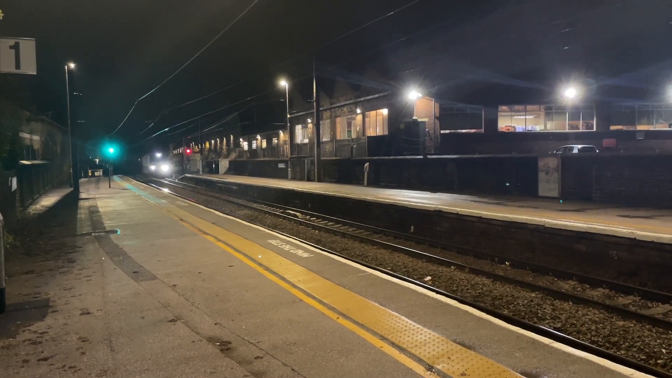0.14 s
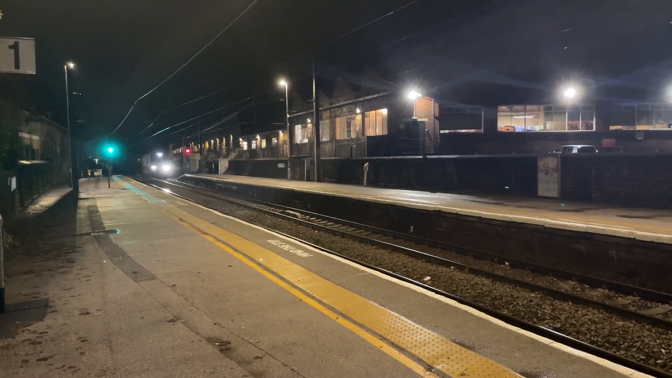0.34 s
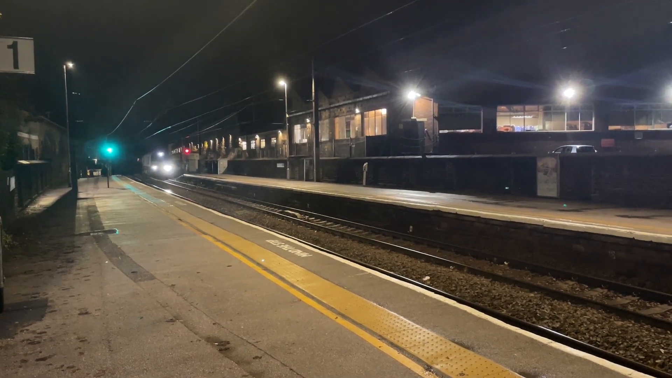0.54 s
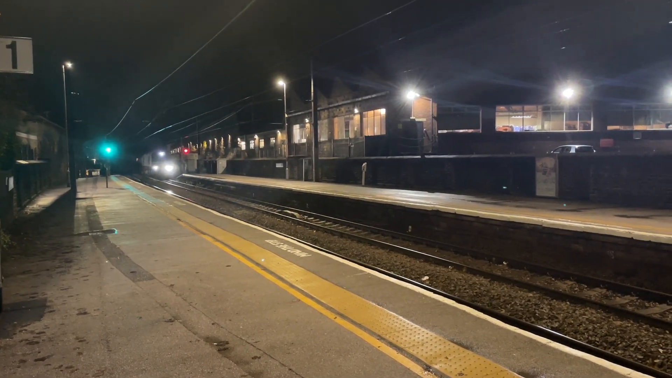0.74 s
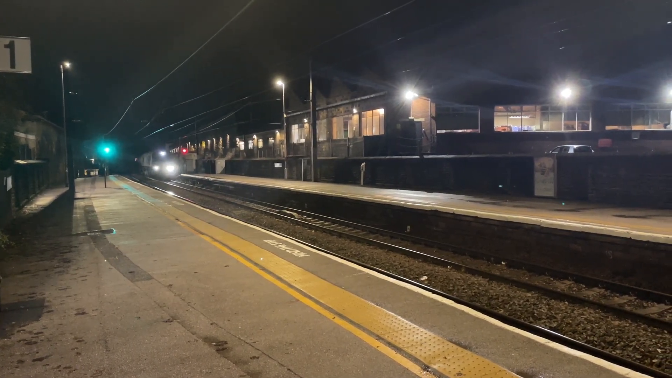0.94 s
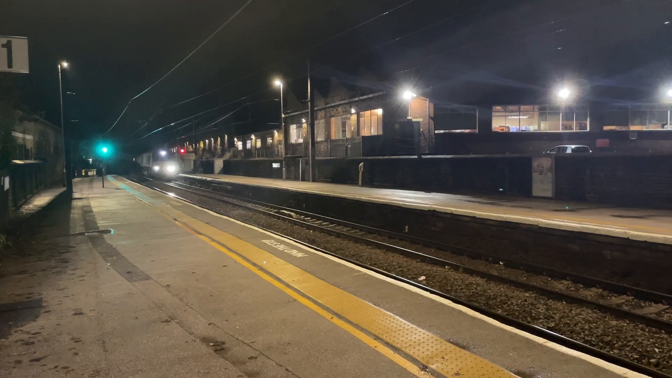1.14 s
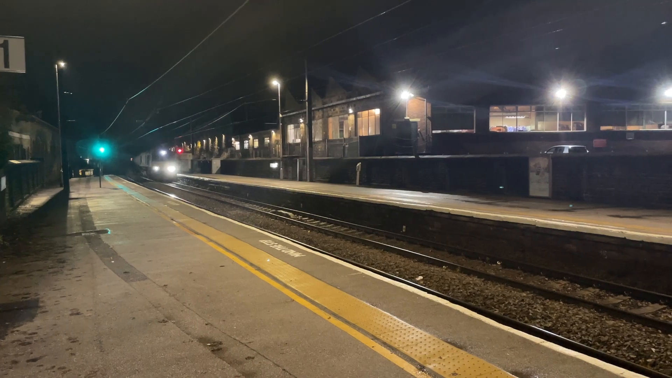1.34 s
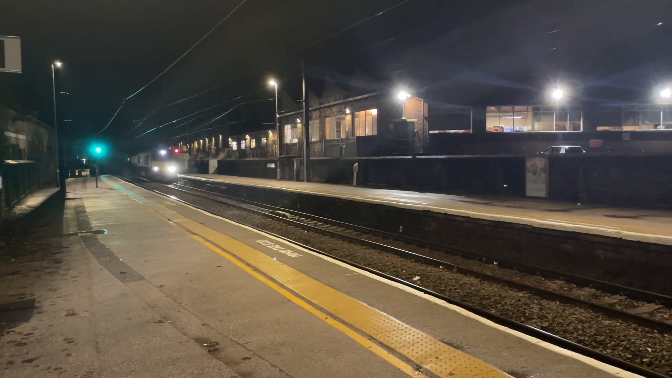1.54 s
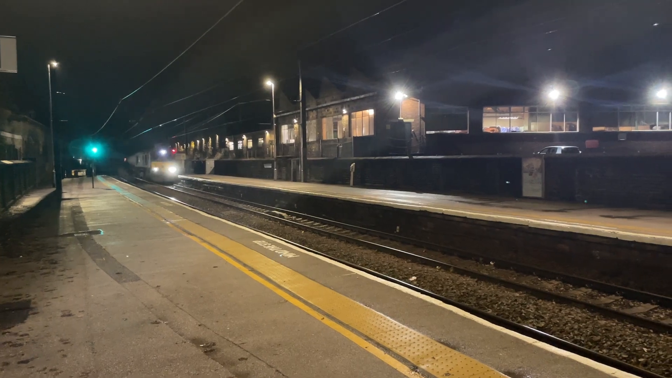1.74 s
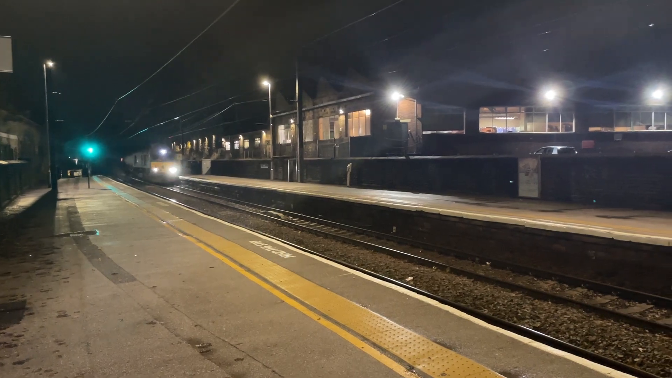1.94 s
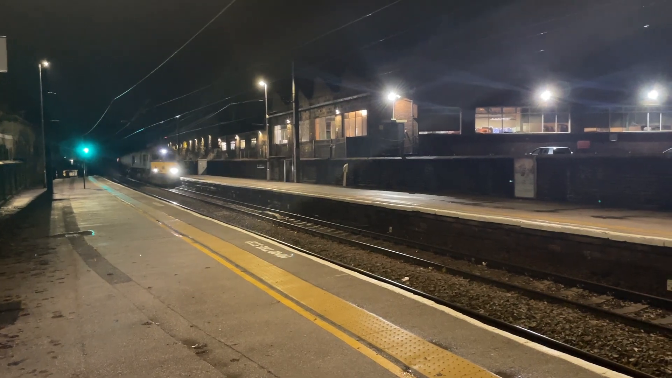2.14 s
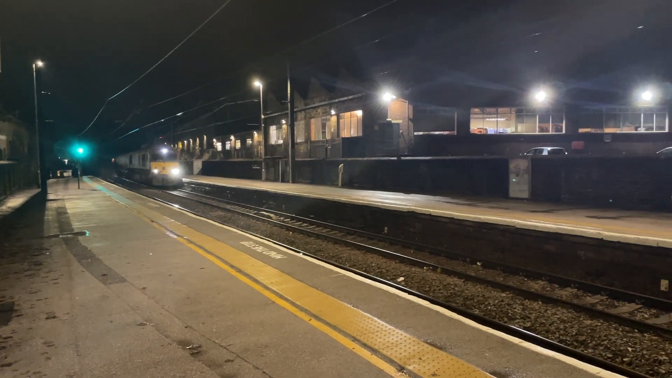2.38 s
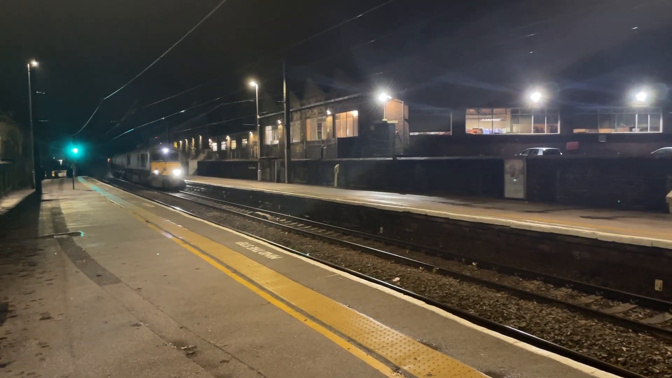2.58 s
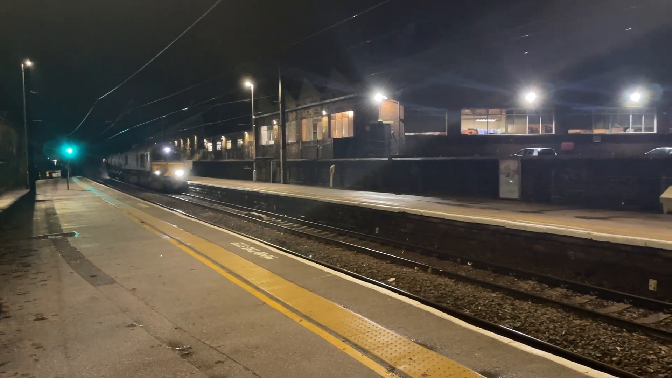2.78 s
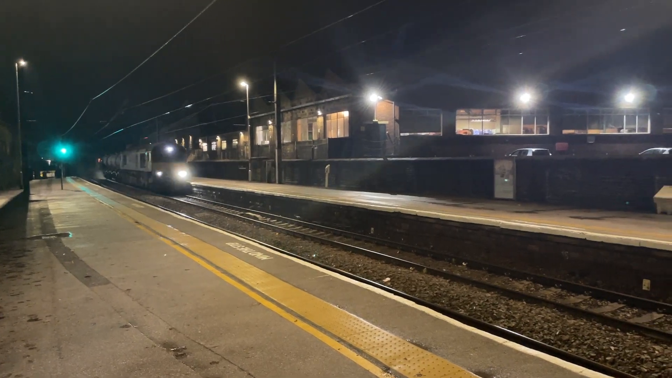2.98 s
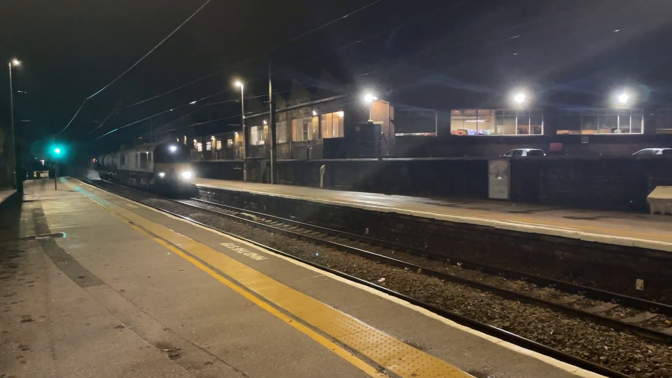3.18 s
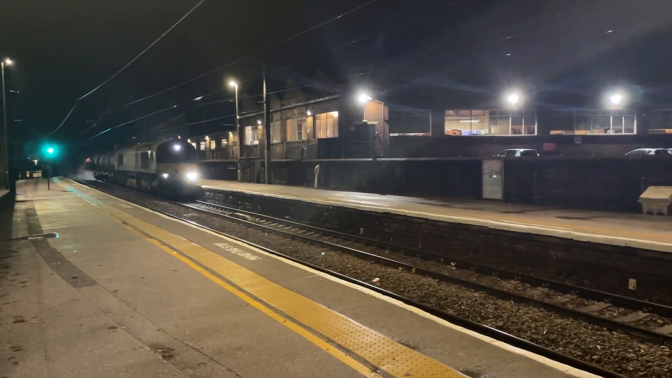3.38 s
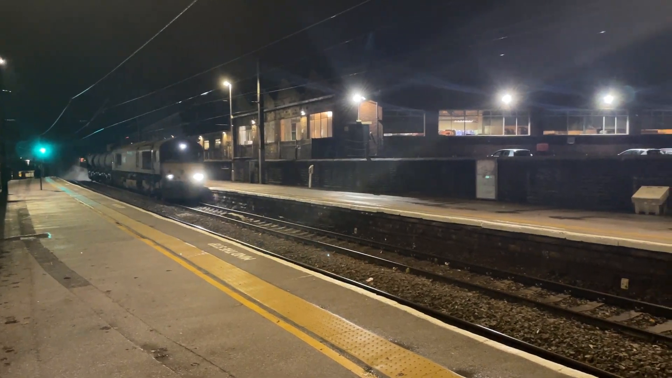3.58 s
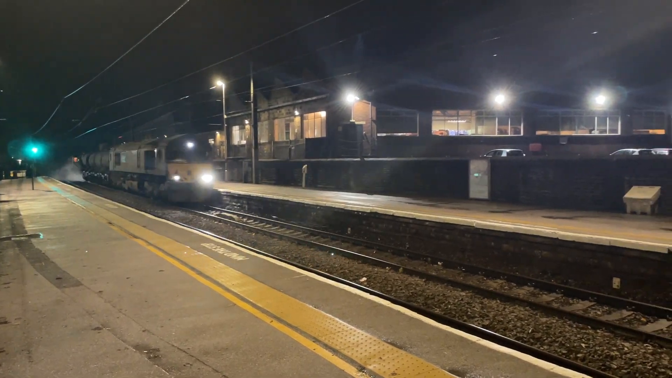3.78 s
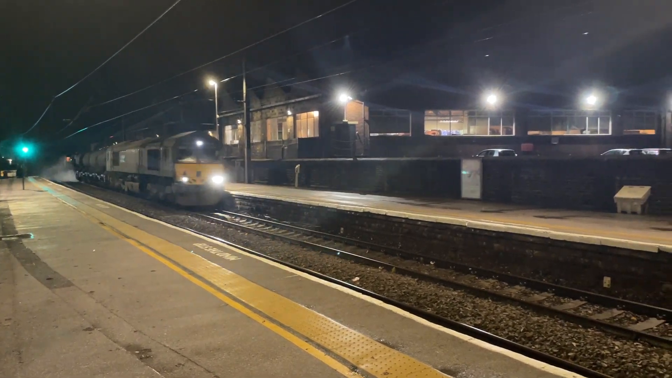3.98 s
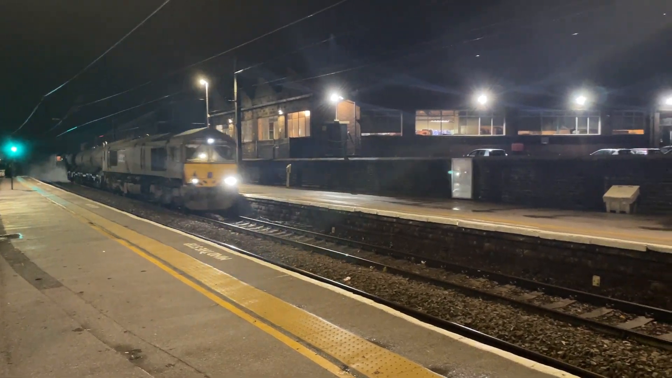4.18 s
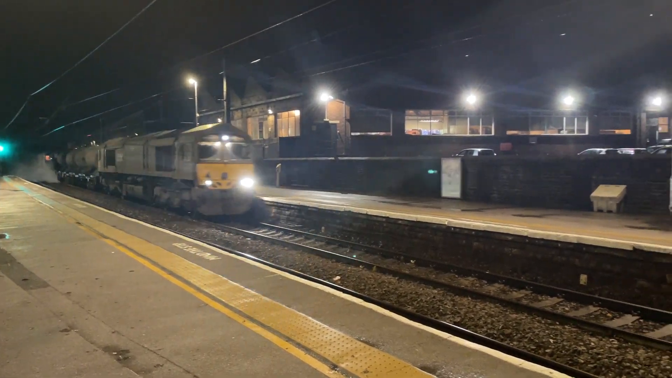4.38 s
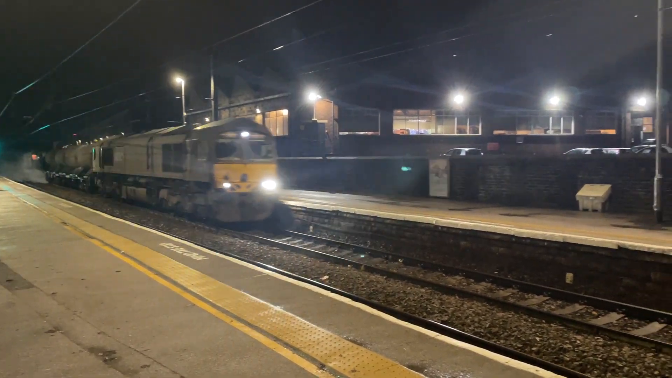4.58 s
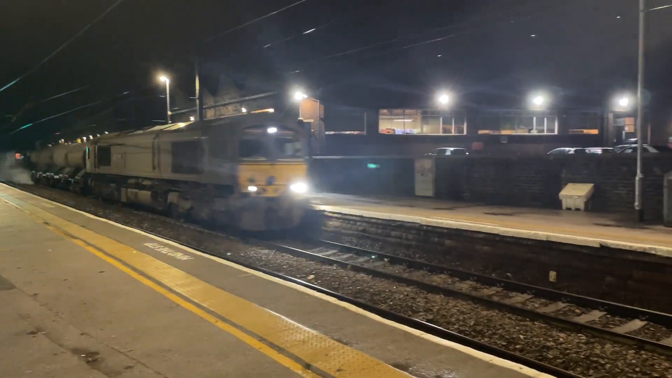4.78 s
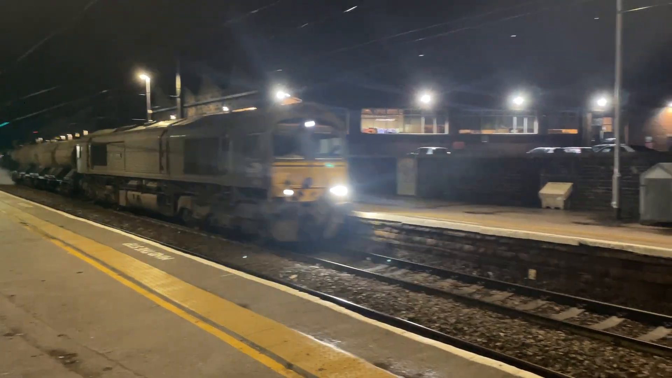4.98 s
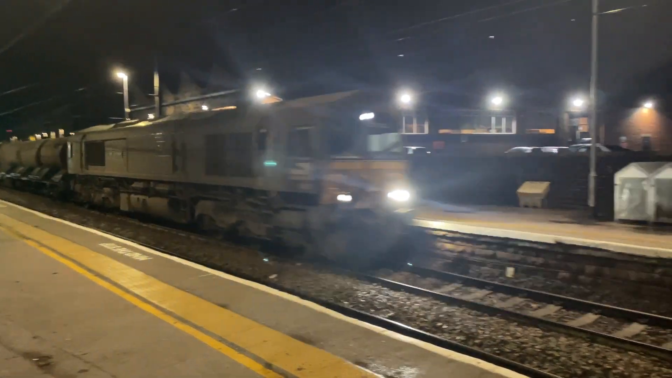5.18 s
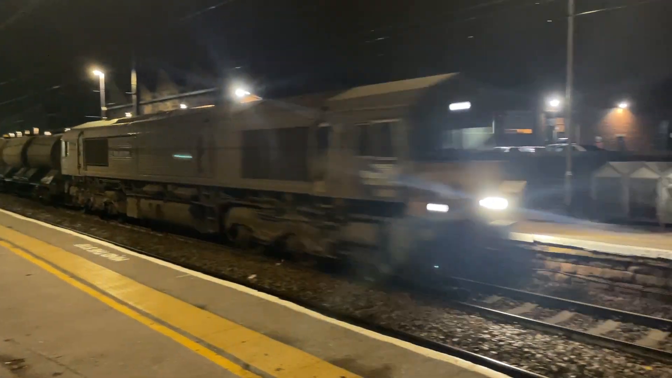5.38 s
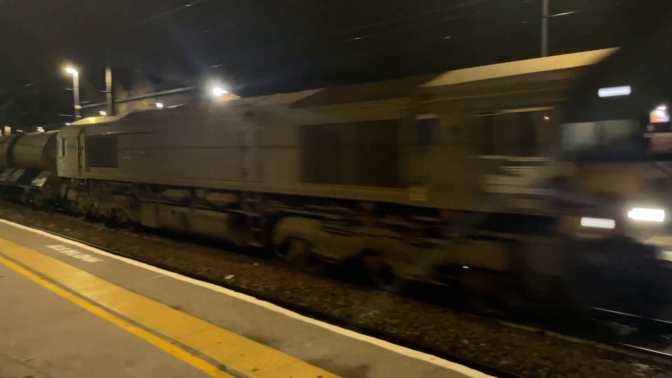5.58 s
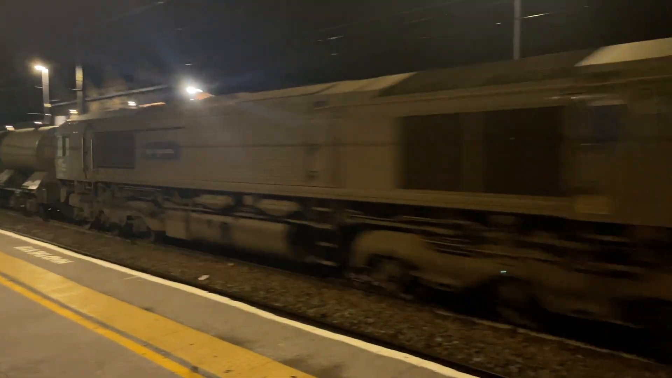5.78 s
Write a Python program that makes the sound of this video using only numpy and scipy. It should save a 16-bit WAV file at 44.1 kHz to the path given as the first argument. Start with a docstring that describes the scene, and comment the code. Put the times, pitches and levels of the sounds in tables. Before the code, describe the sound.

A phone on a platform picks up a heavy diesel locomotive coming from far along the track. Low engine drone and rumble sit under broad wheel-on-rail roar. The hum surges and fades irregularly, then strengthens after the middle. Narrow metallic tones come and go, and fan and rolling hiss grows brighter until the engine sweeps close, with no horn or brake squeal.

```python
"""A low hum and roar from far along the track swell as a diesel freight train runs in at a platform.
Steady tones on multiples of the engine cycle make the exhaust hum, over a rumble of shaped noise.
Wheels and rails roar as noise through track resonances, with narrow singing notes that come and go.
The hiss of fans and rolling contact brightens as the locomotive nears the listener's phone."""
import sys
import numpy as np
from scipy import signal
from scipy.io import wavfile
from scipy.ndimage import uniform_filter1d

SR = 44100
rng = np.random.default_rng(int(sys.argv[2]) if len(sys.argv) > 2 else 0)


def to_wav(s):
    """Save 16-bit WAV."""
    ch = np.atleast_2d(s).T  # columns
    pcm = np.round(np.clip(ch, -1, 1) * 32767)  # PCM
    wavfile.write(sys.argv[1], SR, pcm.astype(np.int16))


N = 257085
FRAME, HOP = 4096, 1024  # samples, for noise shaped frame by frame
TIME_S = np.arange(N) / SR
FRAME_TIME_S = np.arange(N // HOP + 5) * HOP / SR
BIN_HZ = np.fft.rfftfreq(FRAME, 1 / SR)[:, None]

START_M, SPEED_M_PER_S = 124.7, 20  # distance along the track at the start, steady speed
FIRING_HZ, FIRINGS_PER_CYCLE = 85.28, 8

# stereo picture by frequency, how alike left and right are, their phase and balance:
# hz, likeness_0_to_1, right_leads_rad, left_minus_right_db
STEREO = [(60, .99, 0, -2.4), (400, .9, -.25, .3), (650, .78, -.2, -1.6), (1100, .7, 0, 2),
          (1600, .5, .4, 0), (1850, .7, .2, -2), (2500, .5, -1.1, 6.5), (3000, .77, -.8, 4),
          (3750, .55, -.5, 2), (4100, .75, .2, 3.5), (5200, .5, -.8, 5.5), (5700, .65, .2, 1),
          (6500, .77, .7, 1), (7400, .83, 2.1, .8), (7700, 1, np.pi, 0), (8700, 1, np.pi, 0),
          (9000, .8, 3.8, 0), (10100, .65, 5, 0), (10500, 1, 2 * np.pi, 0), (12300, 1, 2 * np.pi, 0),
          (13100, .35, 7.5, 0), (13850, 1, 3 * np.pi, 0)]
# how each noise grows as the train nears: level_at_30_m_db, rise_per_halving_db, closest_it_can_seem_m
RUMBLE_GROWTH = (-26.5, 5.6, 31)
ROAR_GROWTH = (-23, 8.58, 25.3)
HISS_GROWTH = (-33.5, 6.5, 8.1)


def gain_of(db):
    """Decibels to amplitude."""
    return 10 ** (np.asarray(db) / 20)


def evened(x):
    """Scales to rms 1."""
    return x / np.sqrt(np.mean(x ** 2) + 1e-20)


def read(points, hz, axis=1):
    """One column of a table over log frequency."""
    columns = np.transpose(points)
    return np.interp(np.log(hz + 1), np.log(columns[0] + 1), columns[axis])


def level_along(rows, t):
    """A level curve in dB, read at the times t."""
    seconds, level_db = np.transpose(rows)
    return np.interp(t, seconds, level_db)


def wander(t, rate_hz):
    """Slow chance of about rms 1: sines of random phase up to the given rate."""
    knots = np.arange(0, t[-1] + 1, 1 / 100)
    sines = 0
    for f in np.geomspace(rate_hz / 20, rate_hz, 20):
        sines = sines + np.sin(2 * np.pi * (f * knots + rng.random())) / np.sqrt(f)
    return np.interp(t, knots, evened(sines))


def swells(rows, t):
    """Bell-shaped rises in dB."""
    return sum(db * np.exp(-(2 * (t - s) / length) ** 2) for s, length, db in rows)


def approach(t, level_db, halving_db, closest_m):
    """Level in dB of a source that runs in, rising by a fixed step for each halving of its distance."""
    distance_m = np.hypot(START_M - SPEED_M_PER_S * t, closest_m)
    return level_db - halving_db * np.log2(distance_m / 30)


def nearness():
    """How far the colours have slid, frame by frame: 0 far off, 1 at the nearest."""
    closing_db = approach(FRAME_TIME_S, *HISS_GROWTH)
    return ((closing_db - closing_db.min()) / np.ptp(closing_db)) ** 0.46


def far_to_near(far_db, near_db):
    """Slides from a far level or colour to a near one as the train comes in."""
    near = nearness()
    return (1 - near) * far_db + near * near_db


def stereo_noise(colour_db, level_db, patchy_db):
    """Noise of a colour (bins x frames) with drifting patches, partly alike on left and right."""
    bins, frames = colour_db.shape
    a, b, c, d, patches = rng.standard_normal((frames, bins, 5)).T
    patches = uniform_filter1d(patches, size=28, axis=0)  # smooth over frequency
    patches = evened(uniform_filter1d(patches, size=4, axis=1))  # then over time
    colour = gain_of(colour_db + patchy_db * patches)
    colour /= np.sqrt(np.mean(gain_of(colour_db) ** 2, axis=0))  # the level curve alone sets loudness

    likeness = np.clip(read(STEREO, BIN_HZ), 0, 1)
    lead = np.exp(1j * read(STEREO, BIN_HZ, axis=2))
    lean_db = read(STEREO, BIN_HZ, axis=3) / 2
    left = a + 1j * b
    right = lead * (likeness * left + np.sqrt(1 - likeness ** 2) * (c + 1j * d))
    spectra = colour * np.array([left * gain_of(lean_db), right * gain_of(-lean_db)])
    noise = signal.istft(spectra, nperseg=FRAME, noverlap=FRAME - HOP)[1][:, :N]
    return gain_of(level_db) * evened(noise)


def track_rings():
    """Track and wheel resonances: peaks in dB that colour both roar and hiss, sliding far to near."""
    # resonances: hz, width_hz, far_db, near_db
    resonances = [(247, 17, -3.5, 4), (346, 26, 6.5, 4), (410, 15, 2, -5.5), (927, 66, -5, -4.5),
                  (1127, 29, 5.5, -1), (1293, 100, 8, -2), (1728, 27, 3.5, 8.5), (1885, 61, 6.5, 3),
                  (2204, 43, 2, 6), (2900, 360, 3, 2)]
    return sum(far_to_near(far_db, near_db) / (1 + (2 * (BIN_HZ - f) / width) ** 2)
               for f, width, far_db, near_db in resonances)


def rolling_hiss():
    """Fans and rolling contact: noise whose treble, dulled by the air far off, opens up as it nears."""
    # colour far off and near, relative level: hz, db_per_hz
    far_colour = [(600, -60), (1500, -9), (2000, -4), (2500, -4.5), (3500, -3), (5000, -8.5), (7000, -14.5),
                  (9500, -28), (12000, -41), (16000, -51)]
    near_colour = [(600, -60), (1500, -7.5), (2000, -0.5), (2500, -5), (3500, -4.5), (5000, -10.5),
                   (7000, -15), (9500, -17.5), (12000, -27.5), (16000, -33)]
    # a spell in which the hiss swells: centre_s, length_s, rise_db
    gust = [(3.7, 1.1, 1.04)]
    colour_db = far_to_near(read(far_colour, BIN_HZ), read(near_colour, BIN_HZ)) + track_rings()
    level_db = approach(TIME_S, *HISS_GROWTH) + swells(gust, TIME_S)
    return stereo_noise(colour_db, level_db, patchy_db=0.72)


def singing_notes():
    """Rails and wheels singing: narrow bands of noise whose pitch wavers and whose level swells."""
    # notes, levels over the roar: hz, width_hz, far_db, near_db
    note_table = [(482, 18, -16.5, -16.5), (643, 34, -9, -16.5), (711.5, 21, -20, -11),
                  (831, 43, -17.5, -16.5), (952, 16, -27.5, -17.5), (1374, 45, -25, -19)]
    # moments at which a note rings out, one list a note: centre_s, length_s, rise_db
    note_swells = [
        [(2.62, 0.23, 7), (4.25, 0.2, 11.5), (5.58, 0.38, 11.5)],
        [(0.05, 0.35, 9), (1.45, 0.28, 5), (2.85, .3, 5), (4.75, .3, 6)],
        [(4.7, 0.2, 4.5), (5.28, 0.14, 9), (5.82, 0.13, 6)],
        [(1.4, 0.51, 10), (2.15, 0.44, 8), (2.8, .15, 12), (4.95, .15, 9), (5.25, 0.22, 5.5)],
        [(4.66, .15, 7), (5.35, 0.39, 9)],
        [(5.08, 0.18, 8.5), (5.49, 0.13, 8), (5.68, 0.096, 12)],
    ]
    t = FRAME_TIME_S
    power, total_power = 0, 0
    for (f, width, far_db, near_db), rows in zip(note_table, note_swells):
        note_db = far_to_near(far_db, near_db) + wander(t, 12) + swells(rows, t)  # wavers by 1 dB rms
        pitch_hz = f * (1 + 0.0032 * wander(t, 2.57))
        peak = 1 / (1 + (2 * (BIN_HZ - pitch_hz) / width) ** 2) ** 2
        power = power + gain_of(2 * note_db) / width * peak  # doubled dB: amplitude to power
        total_power = total_power + gain_of(2 * note_db)
    over_roar_db = 10 * np.log10(np.interp(TIME_S, t, total_power))
    level_db = approach(TIME_S, *ROAR_GROWTH) + over_roar_db
    return stereo_noise(10 * np.log10(power), level_db, patchy_db=0.6)


def wheel_roar():
    """Wheels on rails: broad noise through the track resonances, its colour sliding far to near."""
    # colour far off and near, relative level: hz, db_per_hz
    far_colour = [(60, -51), (150, -2.5), (220, 2), (300, -5), (480, -4.5), (800, -5.5), (950, -11),
                  (1400, -15), (1700, -17.5), (4000, -74)]
    near_colour = [(60, -47), (150, -1.5), (250, -3.5), (330, -5), (420, -7), (800, -5.5), (1050, -12),
                   (1400, -12.5), (1700, -21), (4000, -82)]
    colour_db = far_to_near(read(far_colour, BIN_HZ), read(near_colour, BIN_HZ)) + track_rings()
    return stereo_noise(colour_db, approach(TIME_S, *ROAR_GROWTH), patchy_db=1.5)


def engine_rumble():
    """Engine block and exhaust turbulence: low noise of one steady colour that grows with nearness."""
    # colour, relative level: hz, db_per_hz
    block_colour = [(18, -40), (28, -26), (40, -2), (55, 2.5), (80, 8.5), (115, 8.5), (135, 0), (200, -5),
                    (400, -87)]
    colour_db = read(block_colour, BIN_HZ) + np.zeros(len(FRAME_TIME_S))
    return stereo_noise(colour_db, approach(TIME_S, *RUMBLE_GROWTH), patchy_db=0.0)


def exhaust():
    """Clean tones on multiples of the engine cycle, whose speed wavers; weak orders make the hum throb."""
    # firing tone, its level swelling and fading unevenly: time_s, level_db
    firing_curve = [(0.0, -39), (0.14, -34), (0.24, -47), (0.47, -29.5), (0.7, -45), (0.9, -32.5),
                    (1.18, -36), (1.7, -33.5), (1.91, -27), (1.98, -36), (2.11, -29), (2.2, -38.5),
                    (2.46, -22.5), (2.58, -36.5), (2.99, -22.5), (3.06, -31.5), (3.18, -33.5), (3.27, -35),
                    (3.55, -21.5), (3.85, -27), (4.06, -19), (4.5, -20.5), (4.72, -24.5), (4.87, -20.5),
                    (5.0, -27), (5.29, -31.5), (5.39, -27), (5.49, -41), (5.58, -27), (5.68, -45),
                    (5.8, -22)]
    # its octave: time_s, level_db
    octave_curve = [(0.0, -49), (0.75, -61), (0.9, -45), (1.74, -37), (2.2, -46), (2.5, -38.5),
                    (3.0, -48.5), (3.18, -39.5), (3.6, -31), (4.04, -31.5), (4.47, -26), (4.72, -34),
                    (5.0, -32), (5.21, -29), (5.49, -28), (5.68, -34), (5.83, -27)]
    # surges of a third drone: centre_s, length_s, rise_over_rest_db
    drone_surges = [(0.47, 0.22, 14.5), (1.3, .15, 4), (1.72, 0.24, 13), (1.92, 0.076, 13),
                    (2.1, 0.14, 12.5), (2.6, 0.29, 14.5), (3.05, 0.13, 10.5), (3.16, 0.1, 7.5),
                    (3.62, .2, 12), (4.04, .2, 11), (4.85, 0.12, 15), (5.7, .25, 12)]
    # weaker orders that beat against the hum: multiple_of_engine_cycle, level_over_rumble_db
    weak_orders = [(4, -10.5), (5, -6.5), (6, -11), (7, -7), (9, -4.5), (10, -13.5), (11, -12)]
    t = TIME_S
    cycle_hz = FIRING_HZ / FIRINGS_PER_CYCLE
    cycles = np.cumsum(cycle_hz * (1 + 0.0025 * wander(t, 3.06))) / SR
    rumble_db = approach(t, *RUMBLE_GROWTH)

    drone_db = rumble_db - 16.5 + swells(drone_surges, t)  # rests 16.5 dB under the rumble
    orders = [(FIRINGS_PER_CYCLE, level_along(firing_curve, t)),
              (2 * FIRINGS_PER_CYCLE, level_along(octave_curve, t)),
              (20, drone_db)]
    for order, over_rumble_db in weak_orders:
        orders.append((round(order), rumble_db + over_rumble_db + 4 * wander(t, 9)))

    out = np.zeros((2, N))
    for order, level_db in orders:
        # orders between the firings depend on uneven cylinders, so their phase drifts
        slip = 0.24 * wander(t, 5) * (order % FIRINGS_PER_CYCLE > 0)
        phase = 2 * np.pi * (order * cycles + slip + rng.random())
        tone = np.sqrt(2) * gain_of(level_db) * np.sin(phase)
        lean_db = read(STEREO, order * cycle_hz, axis=3) / 2
        out += tone * gain_of(lean_db * np.array([[1], [-1]]))  # left, right
    return out


def scene():
    """The train coming in: hiss, singing, roar and rumble behind the hum of the exhaust."""
    return rolling_hiss() + singing_notes() + wheel_roar() + engine_rumble() + exhaust()


def record(dry):
    """The microphone drops the deepest bass, below 35.7 Hz; then a band limit at 15.7 kHz."""
    bass_cut = signal.butter(4, 35.7, "high", fs=SR, output="sos")
    cut = signal.sosfilt(bass_cut, dry)
    band_limit = signal.firwin(511, 15700, window=("kaiser", 9), fs=SR)
    return signal.oaconvolve(cut, band_limit[None], "same")


dry = scene()
out = record(dry)
to_wav(out)
```